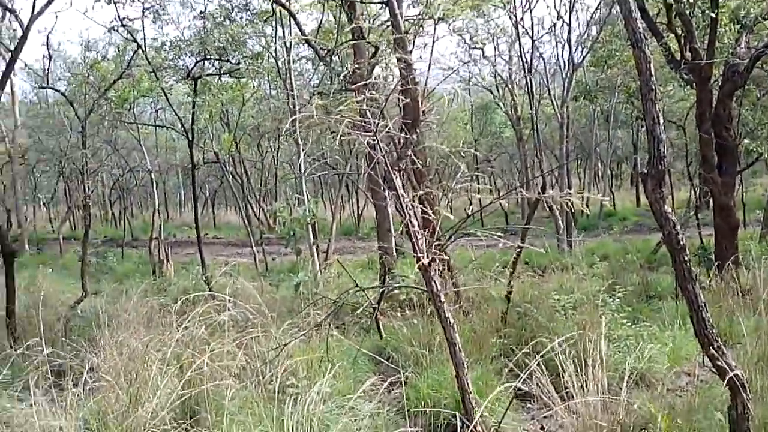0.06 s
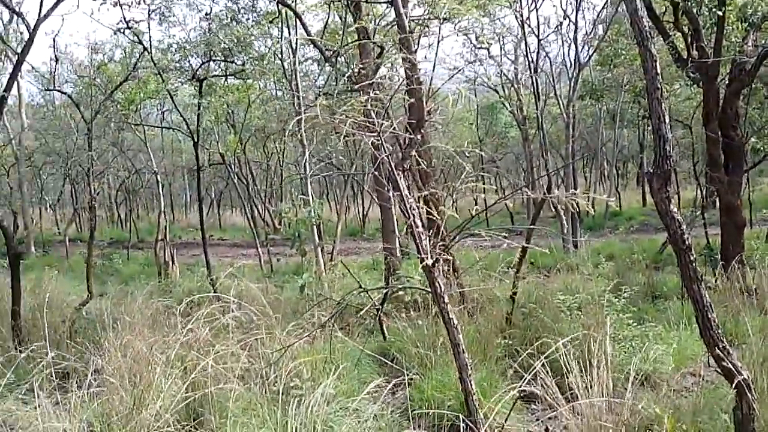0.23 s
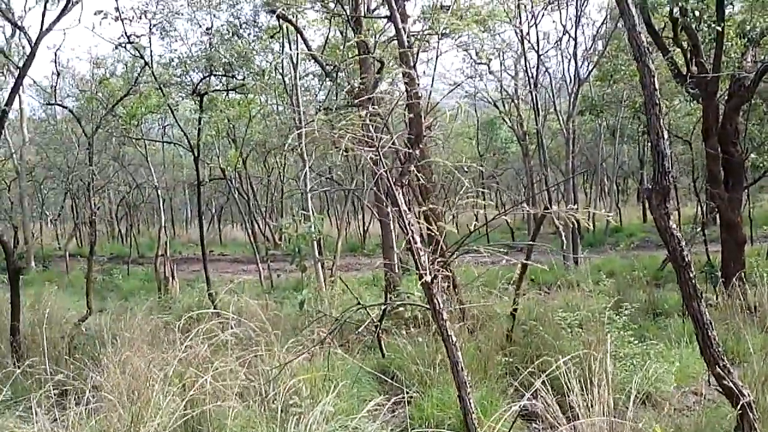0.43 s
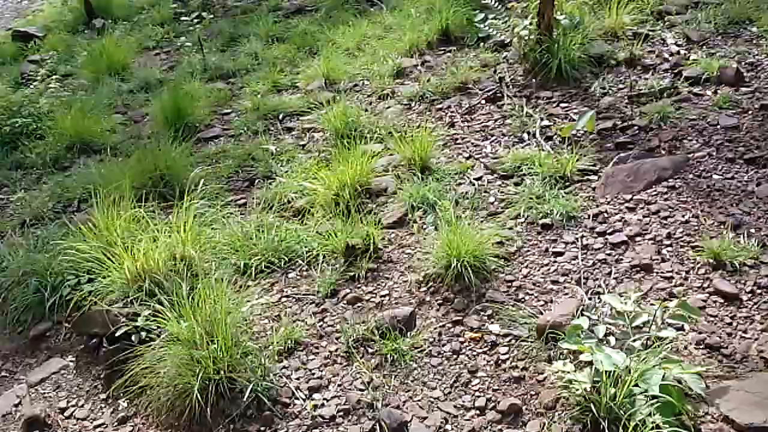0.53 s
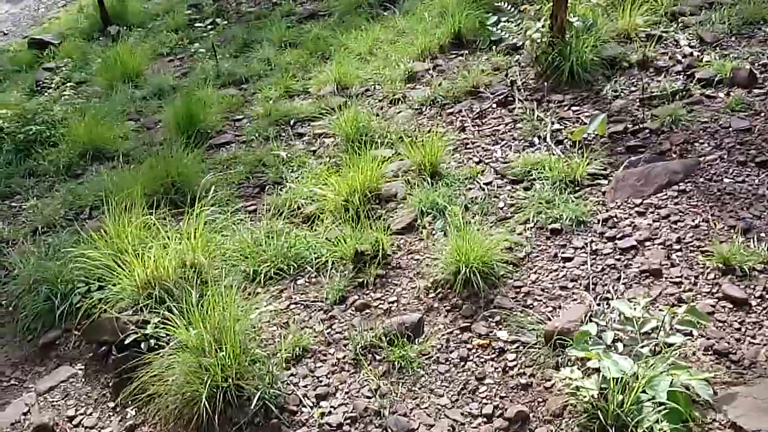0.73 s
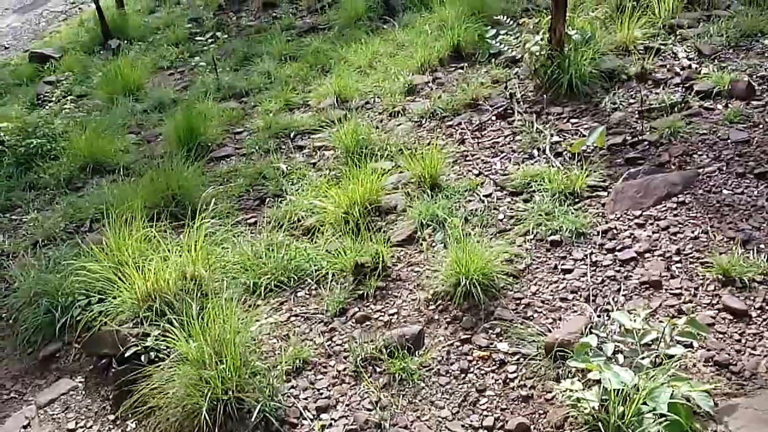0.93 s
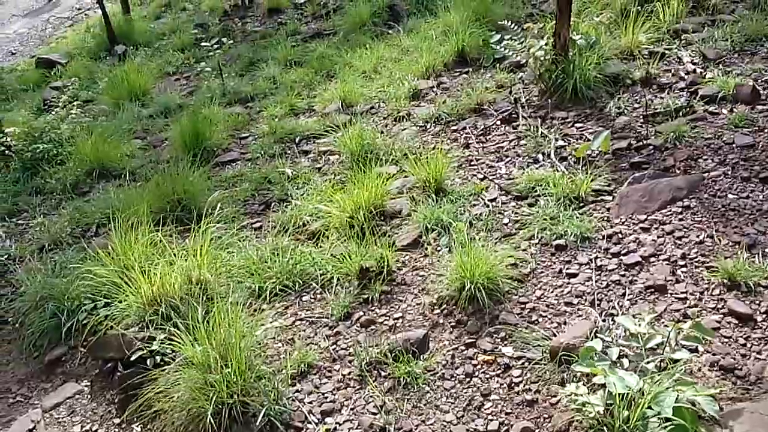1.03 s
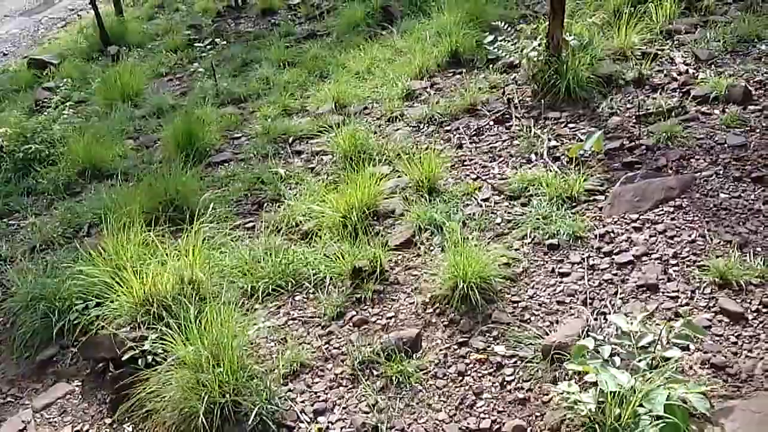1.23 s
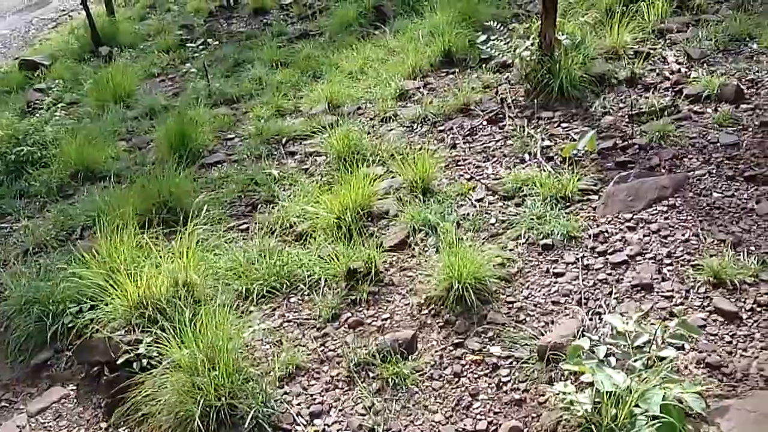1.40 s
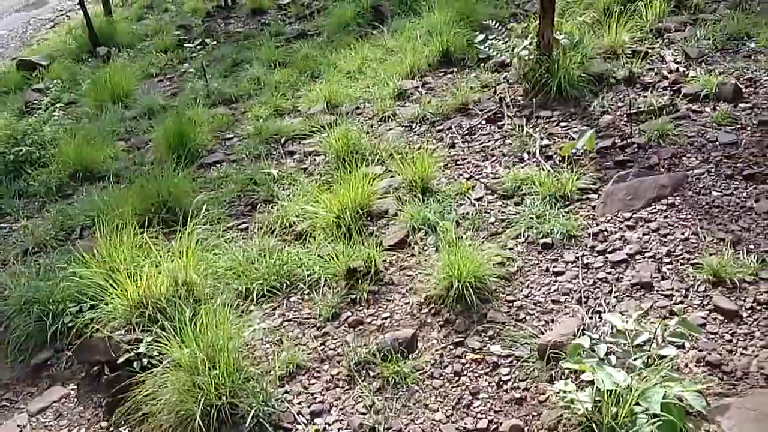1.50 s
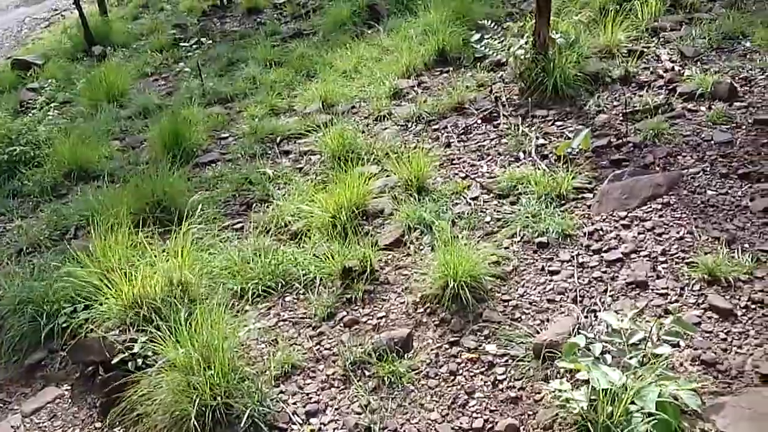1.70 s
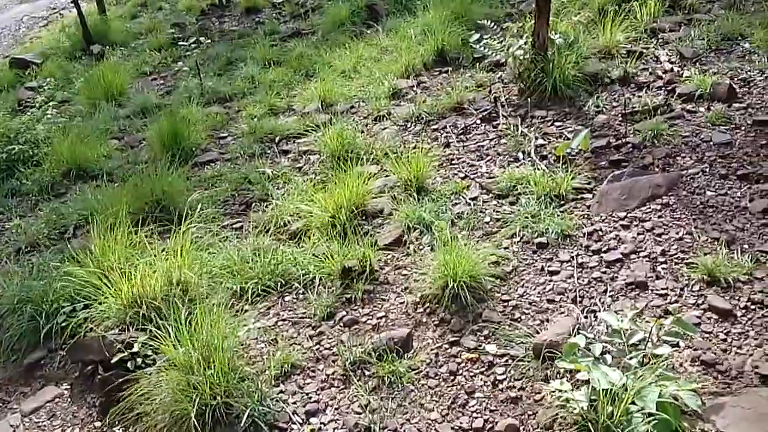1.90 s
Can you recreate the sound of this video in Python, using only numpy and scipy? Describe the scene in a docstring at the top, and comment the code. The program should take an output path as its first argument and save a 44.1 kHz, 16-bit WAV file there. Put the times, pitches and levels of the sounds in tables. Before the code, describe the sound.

Wind buffets the microphone on a wooded hillside. After a faint hiss of grass, a strong gust of low, fluttering thumps builds from about 0.2 seconds and drops away at 0.5. A dry stalk ticks in the lull near 0.8 seconds. Softer puffs and rumble return from 1.1 seconds until about 2. Very faint, distant birds chirp from 0.5 seconds onward over a quiet, steady wash of air.

```python
"""A grassy, wooded hillside in light wind, heard on one microphone. Eddies strike the microphone
in runs of short low thumps: one strong gust, then softer puffs, with a soft rumble of breeze between.
The hardest thumps shed small eddies that flutter more brightly. Nearby, grass hisses faintly and
dry stalks tick; far off, small birds call among the trees over a steady wash of air."""
import sys
import numpy as np
from scipy import signal
from scipy.fft import rfft, irfft, next_fast_len
from scipy.io import wavfile
from scipy.ndimage import uniform_filter1d, map_coordinates

SR = 44100
rng = np.random.default_rng(int(sys.argv[2]) if len(sys.argv) > 2 else 0)


def persist_wave(psi):
    """Save psi, clipped to +-1, as 16-bit WAV."""
    counts = np.round(np.clip(psi, -1, 1) * 32767).astype(np.int16)
    wavfile.write(sys.argv[1], SR, np.atleast_2d(counts).T)


N = 85995


def buffeting(spectrum_centre_hz=100):
    """Each eddy on the microphone is a thump of a few pressure swings; the hardest ones also flutter."""
    # eddies striking the microphone: peak_s, level_db, half_length_s, centre_hz
    thumps = [(0.019, -59.5, 0.027, 59), (.062, -54.5, .012, 110.5), (0.199, -40.5, 0.0064, 80),
              (.24, -36.5, 0.0056, 111.5), (0.256, -37, 0.0047, 84), (0.277, -31, 0.0046, 177),
              (.284, -34.5, 0.0056, 112), (0.295, -26.5, 0.002, 143), (.311, -37, 0.0079, 111.6),
              (.335, -35, 0.0047, 125), (0.362, -25.5, 0.0051, 142.6), (0.376, -32.5, 0.0076, 101.6),
              (.396, -27, 0.0062, 110), (0.425, -30.5, 0.0098, 117.7), (0.446, -22, 0.0039, 125),
              (.455, -30, 0.0025, 298), (0.462, -24.5, 0.0077, 96.5), (0.481, -33, 0.0054, 99.4),
              (0.897, -64.5, 0.033, 104), (1.118, -62, .012, 93), (1.162, -44.5, 0.0073, 112.4),
              (1.18, -45.5, 0.013, 75.7), (1.207, -61, .015, 106), (1.261, -43.5, 0.0067, 65),
              (1.315, -48, 0.01, 90), (1.333, -54, 0.011, 95.6), (1.369, -49.5, 0.0064, 82),
              (1.397, -49.5, 0.026, 80.2), (1.569, -60.5, 0.013, 122), (1.611, -41.5, 0.0086, 79.6),
              (1.661, -41.5, 0.014, 65.4), (1.695, -56, 0.017, 94.5), (1.72, -54.5, 0.0083, 81.5),
              (1.785, -63, .018, 176.6), (1.841, -45.5, 0.014, 103), (1.891, -46.5, 0.013, 91),
              (1.948, -52.5, .007, 107)]
    # spectrum of a thump centred on spectrum_centre_hz: frequency_hz, density_db
    thump_spectrum = [(12, -27.5), (30, -12), (60, -3), (95, 0.5), (140, -6), (200, -19), (300, -34.5),
                      (550, -60), (900, -59.5), (2000, -86.5)]
    t, rumble, gust_power = clock(), np.zeros(N), np.zeros(N)
    for peak_s, level_db, half_length_s, centre_hz in thumps:
        window = bell(t - peak_s, half_length_s)
        flow = eddies(thump_spectrum, size=SR // 2)
        # reading the flow faster or slower moves its spectrum to centre_hz
        position = (t - peak_s) * centre_hz / spectrum_centre_hz * SR + len(flow) / 2
        swing = window * np.interp(position, np.arange(len(flow)), flow)
        rumble += amp(level_db) * swing * np.linalg.norm(window) / np.linalg.norm(swing)
        gust_power += (amp(level_db) * window) ** 2
    gust_db = 10 * np.log10(gust_power + 1e-12)
    return microphone_port(rumble) + flutter(gust_db)


def flutter(gust_db, level_db=-46.5, at_gust_db=-29.5, db_per_gust_db=1.74):
    """Small eddies break off in strong gusts, growing in level faster than the gust itself."""
    # spectrum of the small eddies: frequency_hz, density_db
    flutter_spectrum = [(80, -37), (170, -8), (320, 7), (460, -4), (650, -15.5), (1000, -28), (1500, -60),
                        (3000, -77.5)]
    return eddies(flutter_spectrum) * amp(level_db + db_per_gust_db * (gust_db - at_gust_db))


def microphone_port(pressure, low_hz=36, high_hz=640):
    """Buffeting loses its deepest bass and its top on the way into the microphone."""
    low_cut = signal.butter(3, low_hz, "highpass", fs=SR, output="sos")
    high_cut = signal.butter(3, high_hz, "lowpass", fs=SR, output="sos")
    return signal.sosfiltfilt(np.vstack([low_cut, high_cut]), pressure, padtype=None)


def breeze():
    """Lighter air flows past the microphone and rumbles softly between the thumps."""
    # spectrum of the flow: frequency_hz, density_db
    flow_spectrum = [(15, -15), (45, 4.5), (90, 6.5), (150, -6), (230, -20), (450, -17.5), (800, -23.5),
                     (1500, -30.5), (3000, -58)]
    # strength of the flow: time_s, level_db
    flow_levels = [(0, -54.5), (.14, -63), (.25, -54.5), (.46, -52), (.5, -80.5), (.8, -78.5), (.9, -67.5),
                   (1.04, -74), (1.13, -64), (1.42, -65.5), (1.5, -73.5), (1.59, -64.5), (1.77, -65),
                   (1.95, -65.5)]
    return eddies(flow_spectrum) * amp(curve(flow_levels))


def grass(rustle_db=2.7):
    """Tall dry grass near the microphone hisses, its level flickering quickly."""
    # spectrum of the hiss: frequency_hz, density_db
    hiss_spectrum = [(1500, -20), (3300, -10), (4600, -2.5), (5700, 6.5), (6700, 2), (7600, -4.5),
                     (8300, -17.5), (11000, -29.5)]
    # swell and fall of the hiss: time_s, level_db
    hiss_levels = [(0, -64.5), (.07, -75), (.16, -72), (.25, -81), (.33, -76), (.52, -86.5), (1.95, -87)]
    return coloured(hiss_spectrum) * amp(curve(hiss_levels) + rustle_db * wobble(rate_hz=40))


def stalks(half_length_s=0.001):
    """Dry stalks tick, each a tiny burst of narrow-band noise."""
    # stalk ticks: time_s, peak_db, centre_hz, width_octaves
    ticks = [(0.294, -55, 3800, 0.41), (.377, -56, 2230, 0.4), (.431, -63, 8360, 0.18),
             (.763, -48, 3510, 0.29), (1.79, -75, 8950, .07)]
    t, out = clock(), np.zeros(N)
    for time_s, peak_db, centre_hz, width_octaves in ticks:
        crack = noise(lambda hz: bell(np.log2((hz + 1) / centre_hz), width_octaves), N)
        burst = crack * bell(t - time_s, half_length_s)
        out += amp(peak_db) * burst / np.abs(burst).max()
    return out


def birds(echo_db=-6.5, wood_t60_s=0.29):
    """Short notes from far off, blurred by scattering among the trees, with a soft echo."""
    # distant bird notes: start_s, length_s, pitch_hz, glide_octaves, spread_hz, level_db
    notes = [(.51, 0.12, 2574, 0.01, 260, -73.5), (0.724, 0.099, 2432, 0.0081, 290, -72.5),
             (0.738, 0.093, 3850, -0.026, 397, -72.5), (.93, 0.061, 2340, 0.012, 200, -74),
             (1.198, 0.077, 2300, 0.017, 120, -80.5), (1.462, 0.095, 4710, -.02, 110, -72.5),
             (1.746, .075, 4660, -0.043, 49.4, -74.5), (1.798, 0.069, 4450, -0.0061, 110, -75),
             (1.882, .09, 2290, -0.034, 90, -75.5), (1.891, 0.061, 3010, 0.016, 90, -77),
             (1.906, .06, 3570, .01, 90, -82)]
    t, calls = clock(), np.zeros(N)
    for start_s, length_s, pitch_hz, glide_octaves, spread_hz, level_db in notes:
        progress = np.clip((t - start_s) / length_s, 0, 1)
        envelope = np.sqrt(np.abs(np.sin(np.pi * progress)))
        phase = 2 * np.pi * np.cumsum(pitch_hz * 2 ** (glide_octaves * progress)) / SR
        blur = lambda hz: bell(hz, spread_hz)
        note = noise(blur, N) * np.cos(phase) + noise(blur, N) * np.sin(phase)
        calls += amp(level_db) * envelope * note
    tail = rng.standard_normal(N) * amp(-60 * t / wood_t60_s)
    echo = signal.fftconvolve(calls, tail / np.linalg.norm(tail))[:N]
    return calls + amp(echo_db) * echo


def far_air(level_db=-68.5, waver_db=0.8):
    """Steady air over the hillside, a distant wash that barely wavers."""
    # spectrum of the air: frequency_hz, density_db
    air_spectrum = [(20, -10.5), (60, -3), (170, 1), (300, -1.5), (600, -6), (1000, -7.5), (1700, -10),
                    (3200, -13), (4500, -12), (6400, -16), (7200, -20.5), (8200, -27), (11000, -30),
                    (15500, -33)]
    return coloured(air_spectrum) * amp(level_db + waver_db * wobble(rate_hz=6.6))


def eddies(spectrum, size=N, evenness=0.5):
    """Pressure swings of fairly even size, rms 1; evenness 0 is free noise, 1 is eddies all of one size."""
    pressure = coloured(spectrum, size)
    power = np.abs(signal.hilbert(pressure)) ** 2
    for _ in range(2):
        power = np.abs(uniform_filter1d(power, size=400))
    return unit(pressure / (power + 1e-6) ** (evenness / 2))


def coloured(spectrum, size=N):
    """Noise whose spectrum joins (frequency_hz, density_db) points on a log axis."""
    points_hz, points_db = np.transpose(spectrum)
    return noise(lambda hz: amp(np.interp(np.log(hz + 1), np.log(points_hz + 1), points_db)), size)


def noise(gain, size):
    """Noise of rms 1 shaped by a gain function of frequency."""
    padded = next_fast_len(size + 8192)
    shaped = rfft(rng.standard_normal(padded)) * gain(np.fft.rfftfreq(padded, 1 / SR))
    return unit(irfft(shaped, padded)[:size])


def wobble(rate_hz):
    """A smooth random curve with rate_hz knots a second."""
    knots = rng.standard_normal(int(N * rate_hz / SR) + 4)
    return map_coordinates(knots, [clock() * rate_hz])


def curve(rows):
    """(time_s, value) points joined by straight lines."""
    return np.interp(clock(), *np.transpose(rows))


def bell(offset, width):
    """Gaussian of height 1."""
    return np.exp(-.5 * (offset / width) ** 2)


def amp(db):
    """Decibels to gain."""
    return 10 ** (np.asarray(db) / 20)


def unit(x):
    """Scale to rms 1."""
    return x / np.sqrt(np.mean(x ** 2) + 1e-20)


def clock():
    """Time of each sample in seconds."""
    return np.arange(N) / SR


def scene():
    """Wind on the microphone and the hillside around it, in mono."""
    return (buffeting() + breeze() + far_air() + grass() + stalks() + birds())[None]


def record(dry, top_hz=15500):
    """The recorder keeps nothing above its band limit."""
    padded = next_fast_len(N + SR // 2)
    in_band = np.fft.rfftfreq(padded, 1 / SR) < top_hz
    return irfft(rfft(dry, padded) * in_band, padded)[..., :N]


dry = scene()
out = record(dry)
persist_wave(out)
```